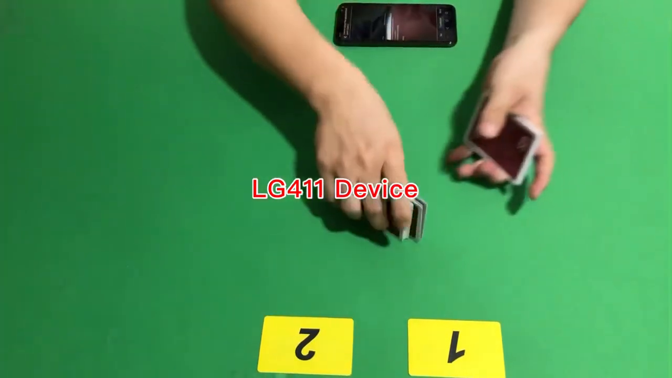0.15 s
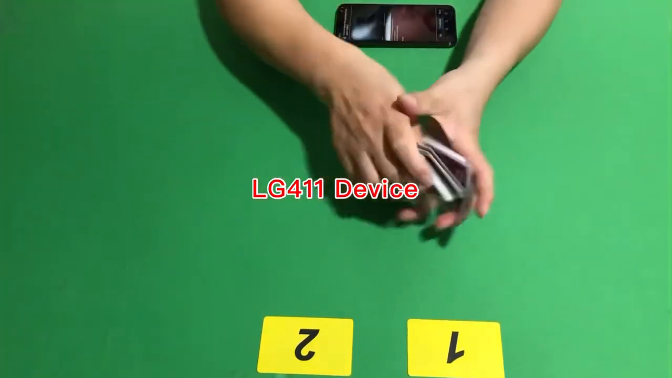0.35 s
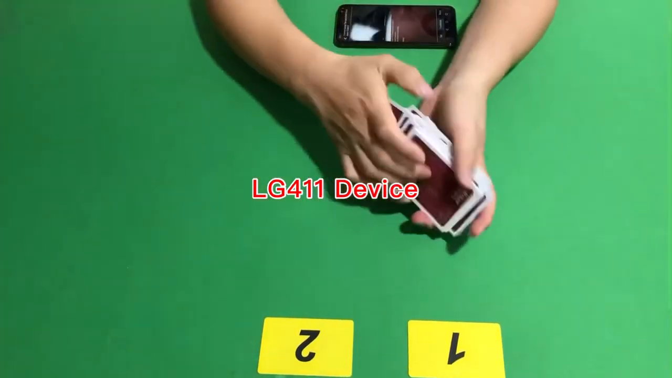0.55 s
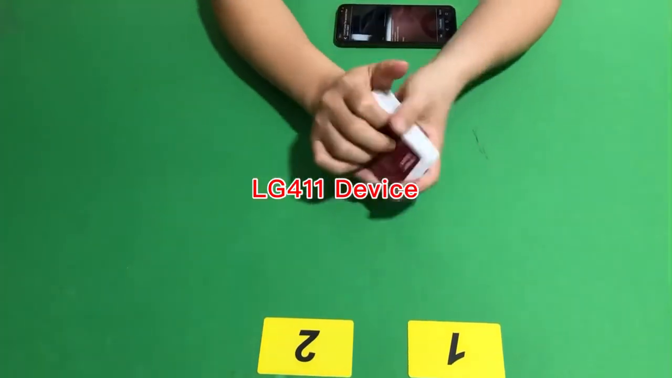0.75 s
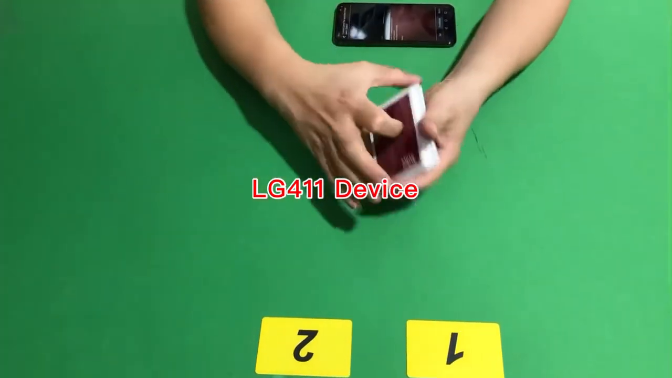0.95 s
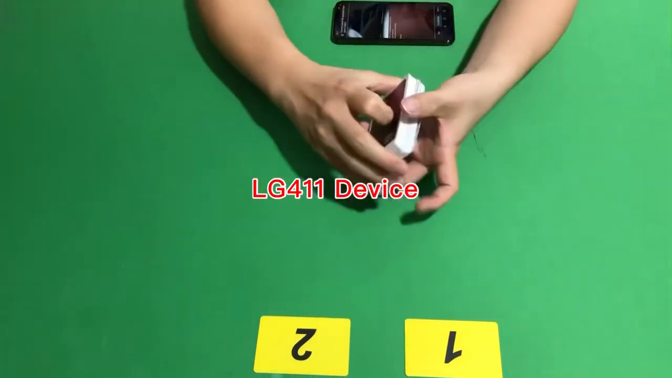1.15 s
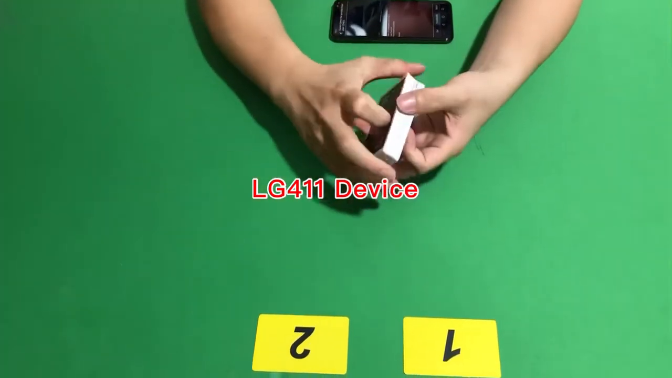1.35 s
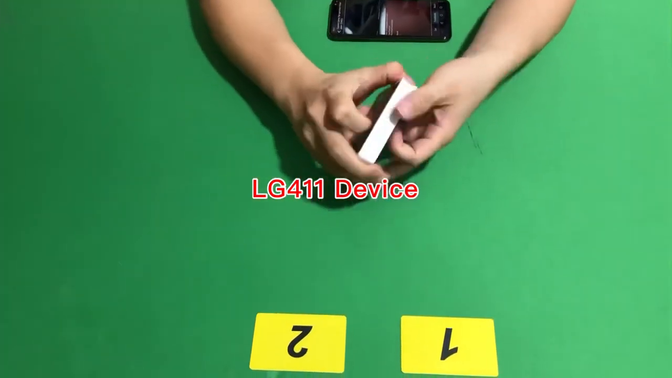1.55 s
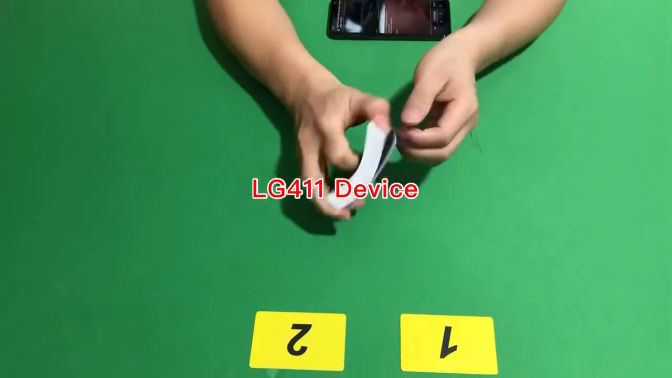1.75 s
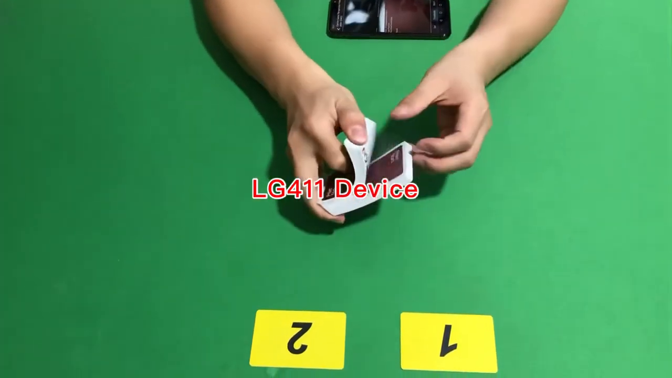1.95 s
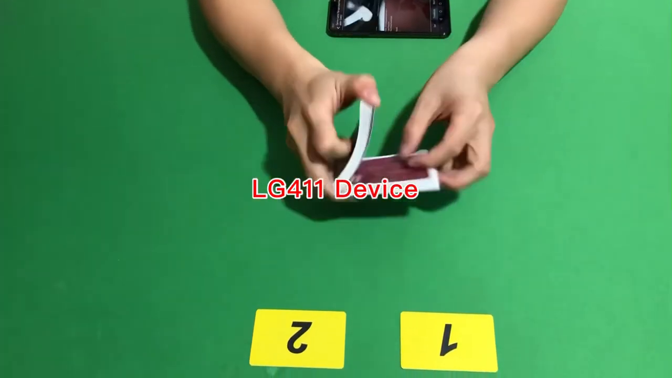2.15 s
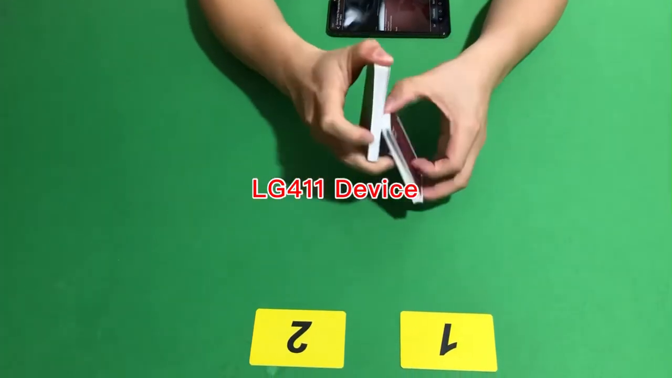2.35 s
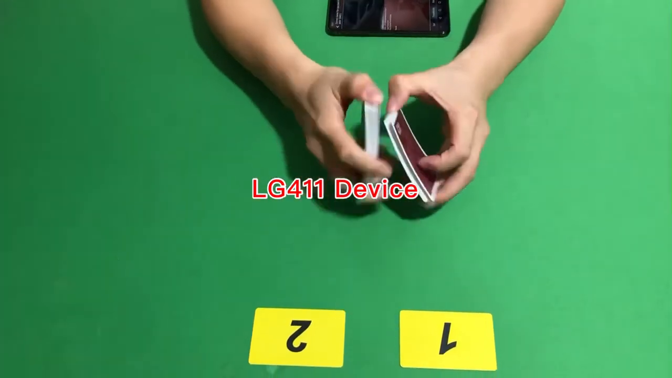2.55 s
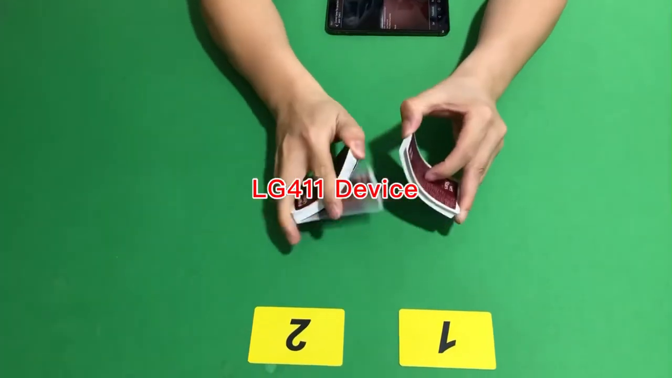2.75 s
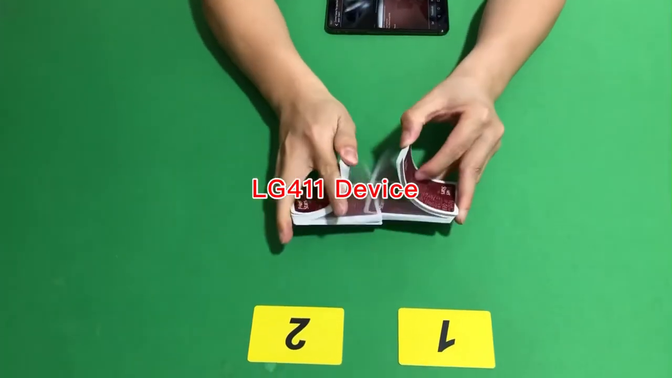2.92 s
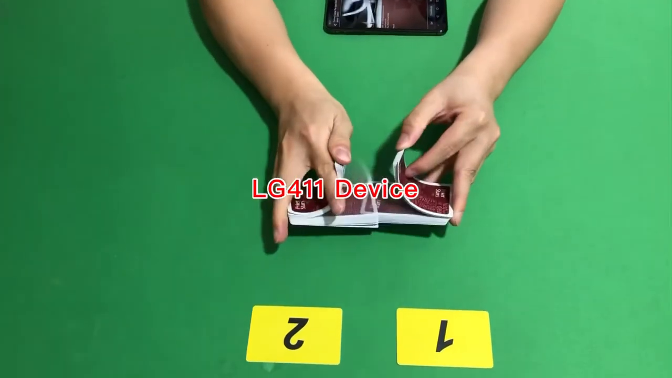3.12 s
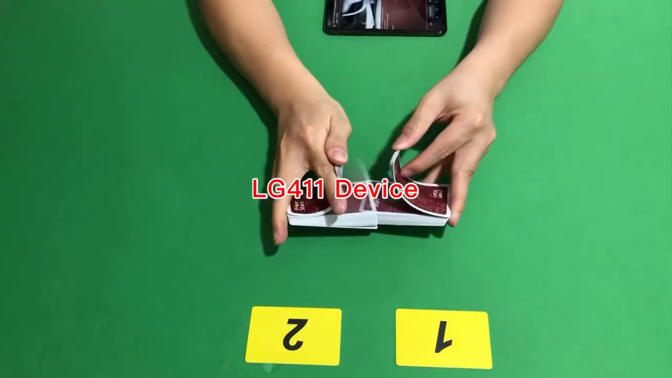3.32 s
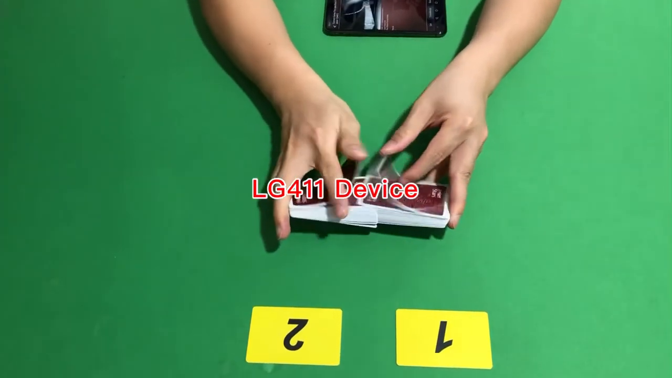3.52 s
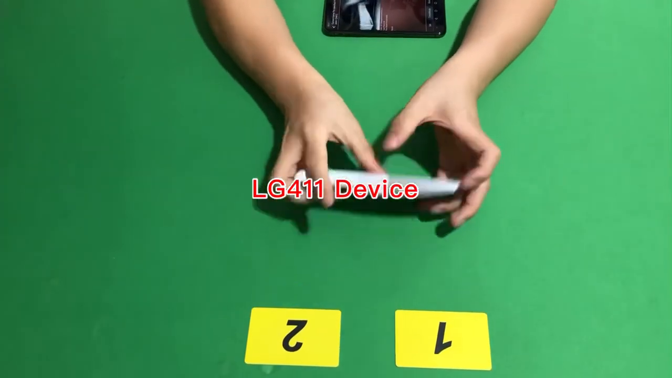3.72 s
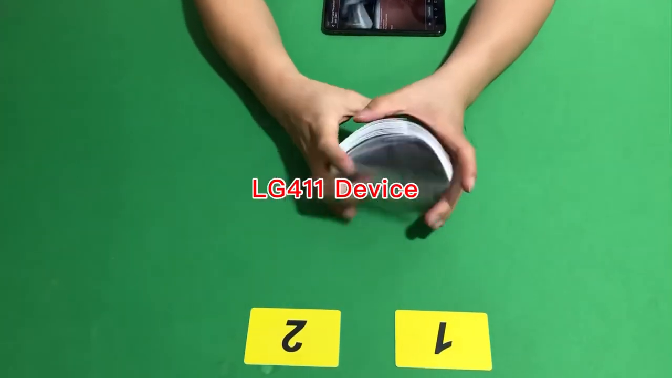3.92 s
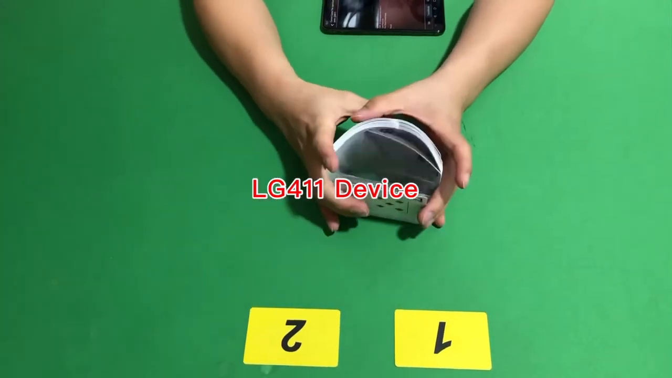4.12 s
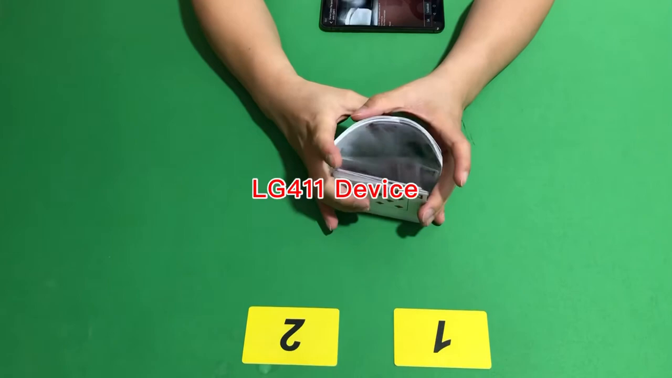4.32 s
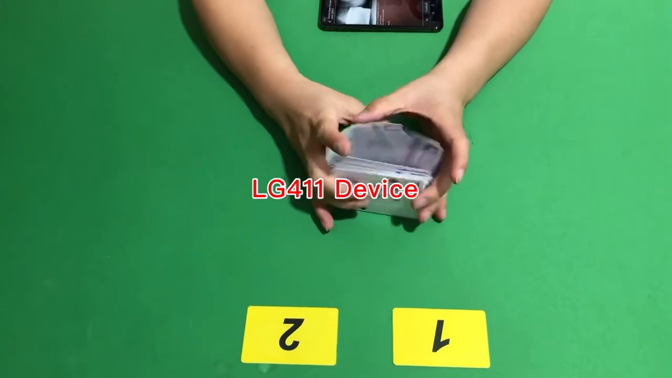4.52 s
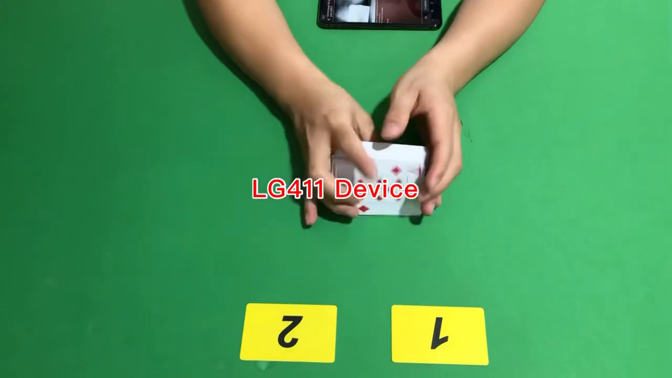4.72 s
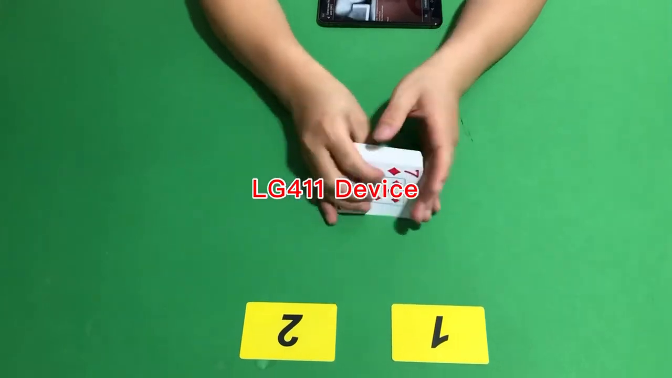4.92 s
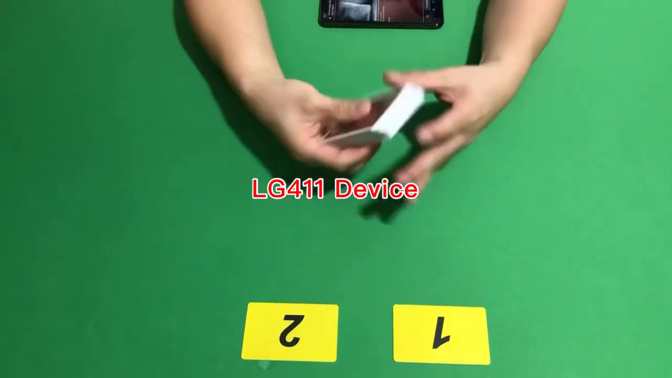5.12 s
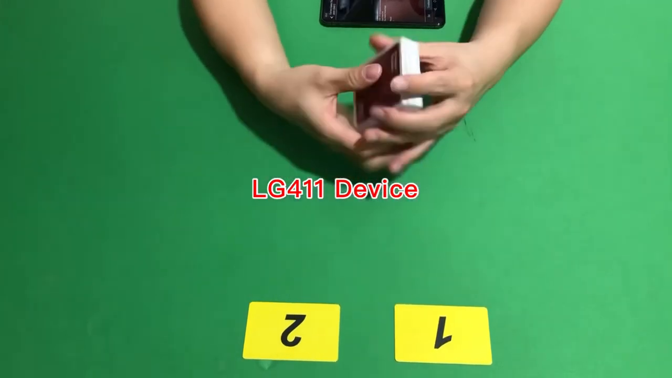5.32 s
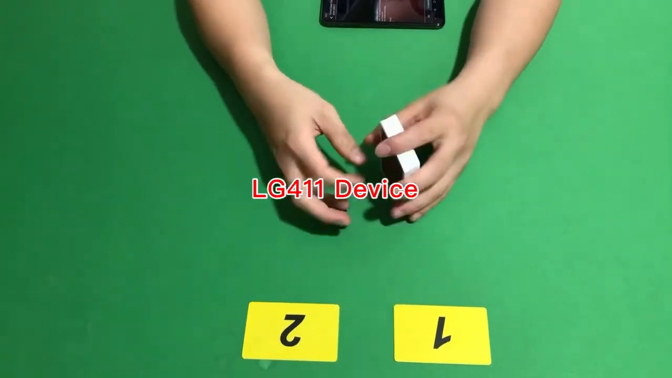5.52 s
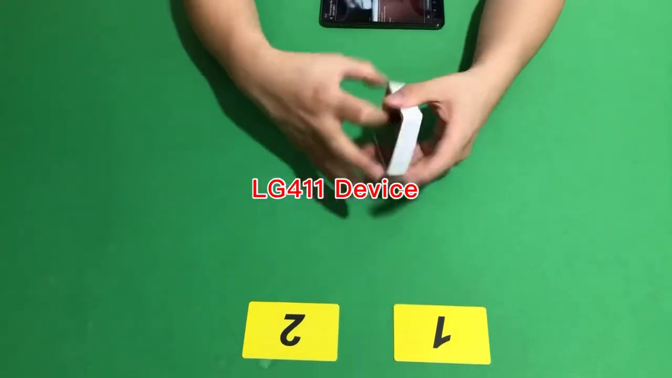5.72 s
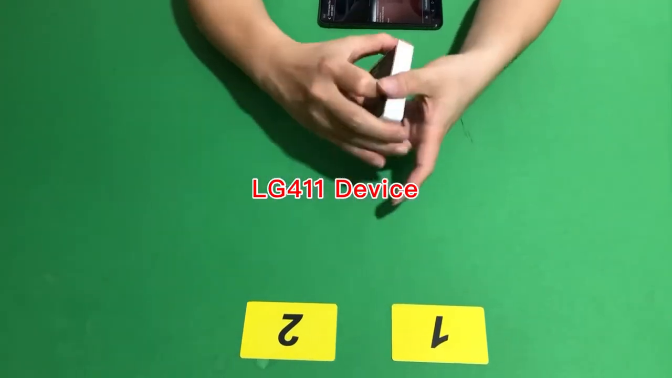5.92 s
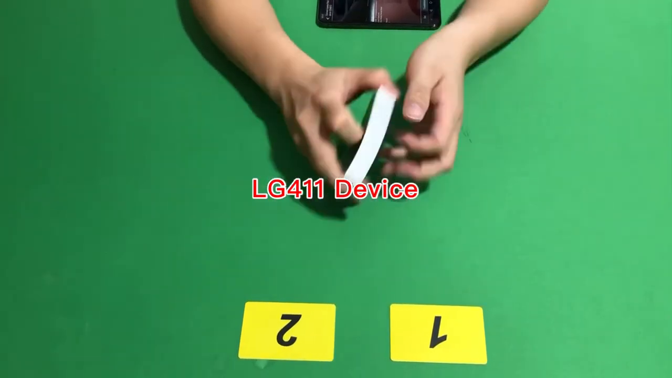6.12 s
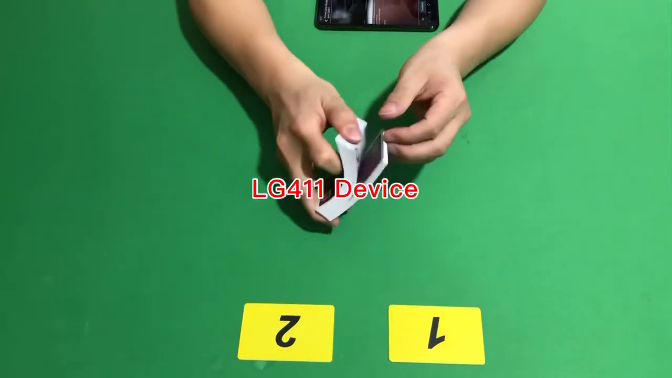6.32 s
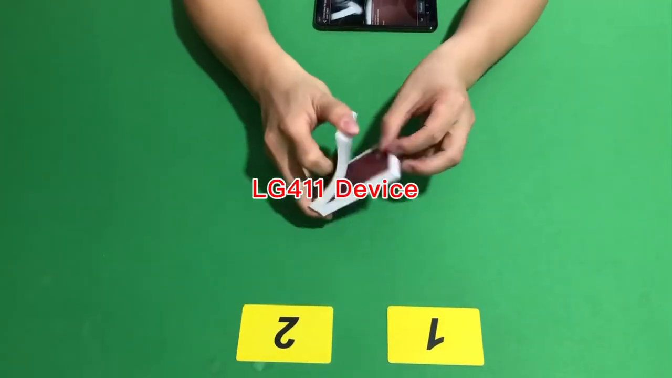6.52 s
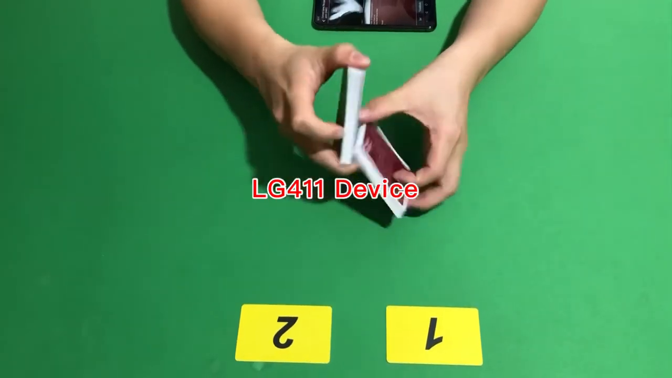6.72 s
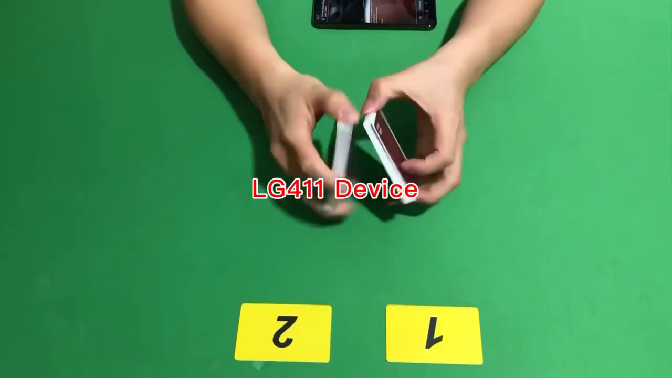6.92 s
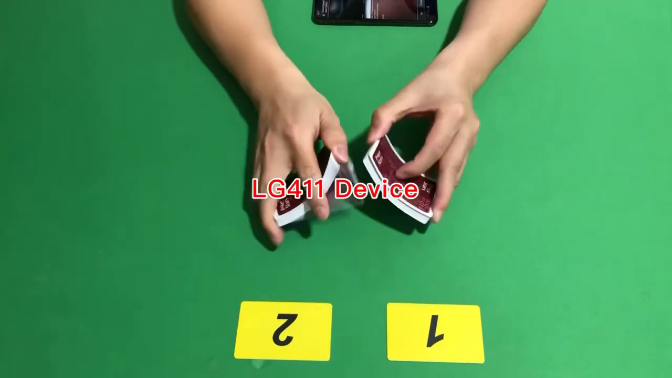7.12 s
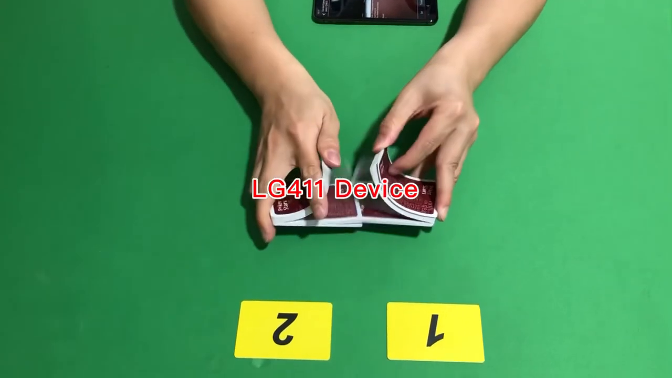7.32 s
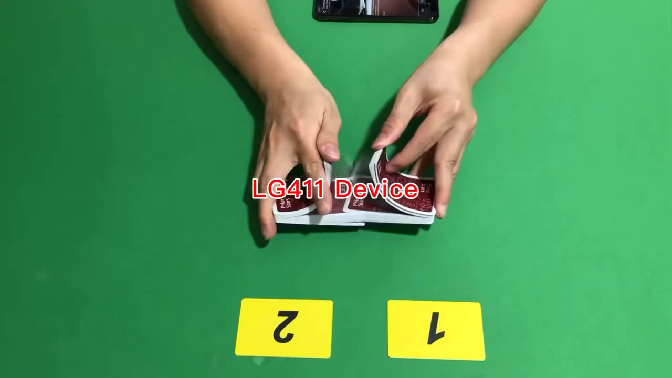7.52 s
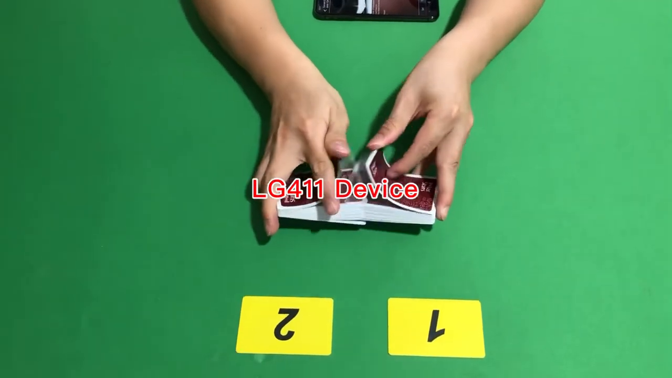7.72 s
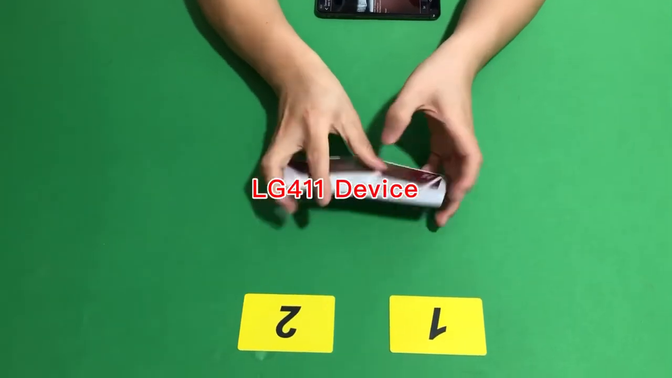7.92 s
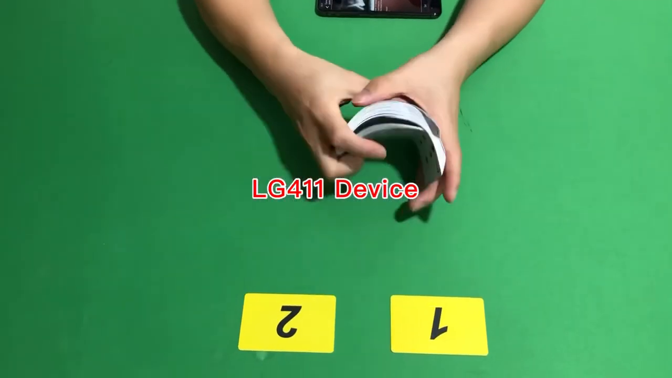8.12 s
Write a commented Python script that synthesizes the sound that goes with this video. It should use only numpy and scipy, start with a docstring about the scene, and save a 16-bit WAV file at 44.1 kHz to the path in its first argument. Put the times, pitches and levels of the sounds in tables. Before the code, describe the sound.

Two card shuffles in a row: taps, a quick purring split, rapid crackling riffle, then a bright papery rush, over faint low ventilation hum.

```python
"""A deck of playing cards is shuffled twice over a cloth-covered table in a small room.
A packet knocks on the table in ringing modes, and the thumb flicks off half the deck in chirping flicks.
The halves riffle together in single snaps, then the arched deck cascades flat in grainy, hissing noise.
Cards and fingers slide, tap and chafe throughout, as shaped noise; a low ventilation hum lies beneath."""
import sys
import numpy as np
from scipy import signal
from scipy.fft import rfft, irfft, next_fast_len
from scipy.io import wavfile
from scipy.ndimage import uniform_filter1d, map_coordinates

SR = 44100
rng = np.random.default_rng(int(sys.argv[2]) if len(sys.argv) > 2 else 0)


def generate_wav(sig):
    """Save sig (samples, or channels by samples) to the path in sys.argv[1] as 16-bit PCM at SR."""
    pcm = np.round(np.clip(np.atleast_2d(sig).T, -1, 1) * 32767).astype(np.int16)
    wavfile.write(sys.argv[1], SR, pcm)


N = 364266
TIME = np.arange(N) / SR
TOP_HZ = 15900  # upper limit of the whole sound
SIZE = 1024  # samples in one snap
SNAP_S = .005  # snap levels are rms as if all the energy fell within this time
SNAP_T, SNAP_HZ = np.arange(SIZE) / SR, np.fft.rfftfreq(SIZE, 1 / SR)

# spectrum of the ventilation hum: hz, level_db
HUM_COLOUR = [(25, -47.5), (45, -6), (87, -2.5), (132, 1.5), (290, -9), (480, -16), (1000, -17.5),
              (4000, -36.5), (15500, -87)]
# spectrum of card faces and fingers rubbing: hz, level_db
RUB_COLOUR = [(150, -17), (900, 1), (5500, 0.5), (9000, -2.5), (15500, -6.5)]
# cards sliding over each other, in the hands and as the bridge starts and ends:
# peak_s, level_db, rise_s and fall_s (time to 20 dB below the peak), tilt_db_per_octave
SLIDES = [(.068, -42.5, 0.063, 0.033, -1.5), (0.309, -41.5, 0.028, 0.036, -2.5),
          (0.358, -38.5, 0.0091, 0.016, -4), (.18, -49, 0.073, 0.09, -2), (.42, -52.5, 0.11, 0.057, 0.5),
          (.555, -50, 0.028, 0.02, -0.5), (0.638, -32.5, 0.052, 0.018, 4), (0.713, -47.5, 0.024, 0.011, 0),
          (.845, -57.5, .025, 0.041, -2), (2.11, -52, 0.04, 0.028, -2), (2.768, -36.5, 0.004, 0.021, -1),
          (3.862, -25, .03, 0.083, 11.5), (4.46, -20.5, .035, 0.012, 12.5), (4.89, -46.5, 0.079, 0.1, -2.5),
          (4.957, -39.5, 0.018, 0.014, -2), (5.36, -54, 0.054, 0.065, -1.5),
          (5.441, -41, 0.0014, 0.0092, -3), (6.145, -52, .012, 0.36, -5.5), (6.725, -59.5, 0.034, 0.06, -3),
          (7.183, -35, 0.033, 0.018, -1), (7.98, -46.5, 0.0053, 0.013, -3)]
# packets and card edges tapping each other: start_s, level_db, centre_hz
TAPS = [(0.0156, -42.5, 1380), (0.0543, -30, 1890), (.087, -42, 3260), (0.2136, -36.5, 3700),
        (0.3242, -29, 3240), (0.3594, -34.5, 3020), (1.677, -43.5, 4540), (2.343, -49, 5570),
        (2.747, -38, 5000), (3.9228, -26.5, 2960), (3.9428, -29, 3470), (4.2709, -23.5, 4230),
        (4.627, -40, 1360), (4.638, -37, 1430), (4.664, -45.5, 1900), (4.96, -51, 3000), (5.583, -54, 4500),
        (6.1225, -33, 4000), (6.753, -53.5, 4200), (7.099, -51, 3740), (7.130, -41, 4720),
        (7.8362, -37, 2440), (8.187, -35, 2900), (8.215, -49, 1710), (8.236, -35.5, 550)]
# the deck knocking on the table:
# start_s, thud_gain_db, contact_cutoff_hz (lower is softer), packet_clack_gain_db
KNOCKS = [(0.0542, -30.5, 1200, -16), (.088, -33, 1070, -36), (5.445, -27, 173, -36.5)]
# modes of the table top, before the contact weighs them: pitch_hz, level_db, t60_s
TABLE_MODES = [(86.5, -5.5, 1.2), (96, 10.5, 0.12), (135, -4, 0.85), (172, 7, 0.2), (269, -7, 0.42),
               (403, 7, 0.1), (570, -3, 0.13)]
# modes of the stiff packet itself: pitch_hz, level_db, t60_s
PACKET_MODES = [(1430, 4.5, 0.01), (2470, 6.5, 0.014), (2600, 0, 0.013)]

# the thumb running down the deck to split it in half:
# first_card_s, last_card_s, swollen_level_db (of the bending wave), brake (extra last gap, in starting gaps)
SPLITS = [(1.713, 1.919, -35, .8), (6.21, 6.374, -38, 1.4)]
# spectrum of a loosely held card's bending wave: hz, level_db
LOOSE_CARD = [(100, -32), (290, 8.5), (450, 10), (700, 4.5), (900, 7), (1250, 2), (2000, 0.5), (2900, 3.5),
              (4200, -8.5), (15000, -18)]
# spectrum of a card edge clicking: hz, level_db
EDGE_COLOUR = [(800, -10), (2500, 2), (5500, 2), (9000, -1), (15500, -5.5)]
EDGE_TILT, EDGE_TILT_HZ = 0.26, 2800  # stronger clicks reach higher: dB per octave per dB, above this pitch
CARD_GAP_S, SPEED_UP, BRAKE_CARDS = .0109, .37, .85  # mean gap; share it shrinks by; cards the thumb brakes over
GAP_JITTER = .05  # no two cards leave the thumb quite alike
SPLIT_SWELL_DB, SPLIT_SWELL_SHARE = 10, 0.61  # the purr swells by this much over this share of the run
RUSTLE_DB = -17  # the passing cards brush each other, relative to their flicks

# cards or fingertips chafing in a narrow band:
# peak_s, level_db, half_length_s (where the swell is down to 1/e), centre_hz
CHAFES = [(2.211, -51, 0.029, 1950), (2.3, -57.5, 0.033, 1840), (2.922, -45.5, 0.084, 3040),
          (3.898, -32.5, 0.033, 5270), (4.933, -44.5, 0.017, 3570), (6.129, -37, 0.0034, 4340),
          (6.892, -54.5, 0.0033, 4030), (8.1, -38, 0.015, 3460)]

# the two riffles: release_s (thumbs start to let go), last_card_s, scrape_db (midway, before it catches),
# first_edge_db and last_edge_db (edge click over bending wave, for a snap of usual level)
RIFFLES = [(2.726, 3.522, -46, -5.5, 8), (7.17, 7.705, -44.5, -1.5, 1.5)]
# cards snapping off the thumbs: start_s, level_db
SNAPS = [(2.8194, -30), (2.835, -48), (2.849, -29), (2.854, -32.5), (2.875, -27), (2.905, -29.5),
         (2.9342, -34), (2.9419, -31.5), (2.977, -28), (3.0136, -26.5), (3.038, -32.5), (3.046, -28),
         (3.065, -30), (3.0753, -29.5), (3.0978, -34.5), (3.1063, -29), (3.1401, -28), (3.1475, -36),
         (3.1789, -31.5), (3.1857, -24), (3.2118, -28.5), (3.223, -32.5), (3.239, -24), (3.256, -34),
         (3.27, -27), (3.2942, -29.5), (3.3077, -27.5), (3.3411, -24), (3.3708, -27.5), (3.3763, -39),
         (3.3989, -27), (3.41, -31.5), (3.438, -29), (3.4428, -30.5), (3.4762, -27), (3.5099, -30.5),
         (7.2028, -35), (7.2293, -31), (7.2557, -26.5), (7.2804, -29.5), (7.3086, -28), (7.3359, -31.5),
         (7.3614, -26.5), (7.3661, -33), (7.3964, -25.5), (7.426, -28), (7.453, -31.5), (7.4576, -33),
         (7.4823, -26.5), (7.496, -33), (7.5035, -30.5), (7.5259, -31.5), (7.5308, -27.5), (7.5487, -33.5),
         (7.5619, -30.5), (7.5746, -30.5), (7.5853, -32.5), (7.5947, -32), (7.6015, -36), (7.6152, -25),
         (7.632, -28.5), (7.6494, -27), (7.6679, -27), (7.6821, -35), (7.6956, -41), (7.711, -35.5),
         (7.7141, -23.5)]
# spectrum of a tightly bent card's bending wave: hz, level_db
BENT_CARD = [(100, -25), (300, -1), (430, 0.5), (680, -2), (1020, 5.5), (1350, -2), (1900, 4.5),
             (2500, -14.5), (3400, -0.5), (5500, -12.5), (15000, -44.5)]
# spectrum of card edges scraping down the thumbs: hz, level_db
SCRAPE_COLOUR = [(150, -8), (900, 4), (3300, 2.5), (4600, -1), (9000, -5.5), (15500, -8.5)]
SCRAPE_RISE_S, SCRAPE_FALL_S = 0.029, 0.0089
SCRAPE_SWELL_DB = 2.5  # the thumbs bear down harder as the packets thin
CATCH_RATE, CATCH_DB = 110, 3.5  # the scrape catches and slips: random knots a second, depth
USUAL_DB, EDGE_GROWS = -29.5, 0.22  # a harder snap is brighter: dB of edge click per dB above the usual level
EDGE_SPREAD_DB = 3  # card-to-card spread of the edge click
SLAP_S, SLAP_DB = 0.0017, -8  # mean delay and level of the softer slap onto the pile
SLAP_EDGE_DB = 3.5  # the slap has this much more edge click over its bending wave
DRAG_S, DRAG_DB = 0.00027, -4.5  # the edge drags harder and harder just before it lets go

# the bridge, arched cards cascading flat: first_card_s, length_s, hiss_db
BRIDGES = [(3.776, 0.7, -29), (8.017, .668, -29.5)]
# spectrum of cards slipping off each other: hz, level_db
HISS_COLOUR = [(500, -63), (1700, -8), (2700, 6), (4700, 4.5), (5400, 7), (6400, 7), (11000, 5),
               (15500, 6.5)]
# spectrum of cards landing on the pile: hz, level_db
FLUTTER_COLOUR = [(70, -16), (170, 5), (400, 5.5), (560, 0.5), (900, 2.5), (2200, -1), (4000, -30)]
HISS_RISE_S, HISS_FALL_DB_PER_S = 0.05, 379
FLUTTER_DB, FLUTTER_DELAY_S, FLUTTER_FALL_DB_PER_S = -16, 0.077, 38  # landings, level relative to the hiss
# bunches of cards dropping from the bridge onto the fingers: start_s, level_db
THUMPS = [(3.972, -38), (4.17, -47), (4.511, -42), (4.567, -43)]
THUMP_HZ, THUMP_T60_S = 156, 0.21

# decay of the room: hz, t60_s
ROOM_DECAY = [(150, 0.92), (2500, 0.83), (8000, 0.76), (15000, 0.51)]
# colour of the room's answer: hz, level_db
WALL_COLOUR = [(400, 2.5), (950, 0), (3200, 0.5), (5500, -2), (15000, -10)]


def amp(db):
    """Decibels to gain."""
    return 10 ** (np.asarray(db) / 20)


def unit(x):
    """Scale to rms 1."""
    return x / np.sqrt(np.mean(x ** 2) + 1e-20)


def along(points, hz):
    """Read (hz, value) points on a log frequency axis."""
    f, v = np.transpose(points)
    return np.interp(np.log(hz + 1), np.log(f), v)


def filtered(x, response):
    """Shape x with a gain that depends on frequency."""
    size = next_fast_len(len(x) + SR // 10)
    return irfft(rfft(x, size) * response(np.fft.rfftfreq(size, 1 / SR)), size)[:len(x)]


def coloured(x, spectrum, tilt_db=0):
    """Shape x with a spectrum, tilted per octave, at rms 1."""
    return unit(filtered(x, lambda hz: amp(along(spectrum, hz) + tilt_db * np.log2(hz + 1))))


def add(track, s, sound):
    """Mix a sound into the track at time s."""
    start = max(round(s * SR), 0)
    track[start:start + len(sound)] += sound[:max(N - start, 0)]


def onset(t, rise_s):
    """A smooth rise from 0 to 1 that starts at t = 0."""
    return 1 - np.exp(-(np.maximum(t, 0) / rise_s) ** 2)


def wobble(rate):
    """A smooth random curve, rate knots a second, clipped to -2 and 1."""
    knots = TIME * rate
    return map_coordinates(rng.standard_normal(2048), [knots], mode="mirror").clip(-2, 1)


def ripple(step_hz):
    """A smooth random curve over frequency: no two cards are bent alike."""
    knots = SNAP_HZ / step_hz
    return map_coordinates(rng.standard_normal(64), [knots], mode="mirror")


def band(hz, centre, width):
    """Gain of one resonance, its width in octaves."""
    return 1 / np.sqrt(1 + (np.log2((hz + 1) / centre) / width) ** 2)


def ringing(modes, t, contact):
    """Damped modes, each as strong as the contact drives it."""
    out = 0
    for hz, level_db, t60 in modes:
        out = out + contact(hz) * amp(level_db - 60 * t / t60) * np.sin(2 * np.pi * hz * t)
    return out


def friction(rate, grain, spread_db):
    """Smooth rubbing noise with tiny stick-slip impulses, rate a second on average."""
    struck = rng.random(N) < rate / SR
    strength = amp(spread_db * np.clip(rng.standard_normal(N), -2, 2))
    slips = struck * rng.choice([-1, 1], N) * strength
    return unit(rng.standard_normal(N) + grain * unit(slips))


def burst(t60, rise):
    """Spectrum of a puff of noise that builds up and dies, mean power 1."""
    puff = rng.standard_normal(SIZE) * amp(-60 * SNAP_T / t60) * onset(SNAP_T, rise)
    return rfft(puff / np.linalg.norm(puff))


def snap(excitation, colour_db):
    """A short excitation through a causal colour, at level 1."""
    # folding the cepstrum gives the minimum-phase version of the colour
    cepstrum = irfft(np.log(amp(colour_db) + 1e-6))
    cepstrum[1:SIZE // 2] *= 2
    cepstrum[SIZE // 2 + 1:] = 0
    sound = irfft(excitation * np.exp(rfft(cepstrum)))
    return sound * np.sqrt(SNAP_S * SR) / np.linalg.norm(sound)


def flick(card, edge_db, travel_s, scatter, rattle_t60):
    """One released card: its edge clicks and a bending wave runs along it."""
    # bending waves travel at a speed that goes with the root of frequency, so the snap chirps downward
    delay = travel_s * amp(rng.normal(0, 2)) * np.sqrt(1000 / (SNAP_HZ + 100))
    chirp = np.exp(-2j * np.pi * np.cumsum(delay - delay[-1] / 2) * SR / SIZE)
    rattle = scatter * burst(rattle_t60, rise=0.0013)
    wave = snap(chirp + rattle, along(card, SNAP_HZ) + 2 * ripple(980))
    bright_db = EDGE_TILT * edge_db * np.log2(np.maximum(SNAP_HZ / EDGE_TILT_HZ, 1))
    edge_puff = burst(0.0026, rise=0.00049) + 0.24 * burst(0.0073, rise=0.0014)
    click = snap(edge_puff, along(EDGE_COLOUR, SNAP_HZ) + bright_db + 2 * ripple(1700))
    return wave + amp(edge_db) * click


def ventilation_hum():
    """Steady noise with its weight in the lows."""
    return amp(-50) * coloured(rng.standard_normal(N), HUM_COLOUR)


def handling():
    """Held cards never lie quite still: a faint, uneven rustle with tiny ticks."""
    return amp(-72 + 2.7 * wobble(14)) * coloured(friction(160, 0.79, 6.5), RUB_COLOUR)


def slides():
    """Cards rub over each other in grainy strokes that swell and fade, each with its own brightness."""
    out, rub, size = np.zeros(N), friction(1200, 0.2, 6), SR // 2
    for s, db, rise, fall, tilt_db in SLIDES:
        start = max(round(s * SR) - size // 2, 0)
        t = TIME[start:start + size] - s
        distance = np.maximum(-t / rise, t / fall).clip(0)
        swell = amp(db - 20 * distance ** 2.2)
        out[start:start + size] += swell * coloured(rub[start:start + size], RUB_COLOUR, tilt_db)
    return out


def taps():
    """Card stock clacks: a short noise burst through one broad, quickly damped resonance."""
    out = np.zeros(N)
    for s, db, hz in TAPS:
        resonance_db = 20 * np.log10(band(SNAP_HZ, hz, 0.88))
        colour_db = resonance_db - 1.6 * np.log2((SNAP_HZ + 1) / hz) ** 2
        add(out, s, amp(db) * snap(burst(0.016, rise=0.00044), colour_db))
    return out


def knocks():
    """The packet clacks, thuds on the cloth and rings the table; a soft contact leaves only the low modes."""
    out, t = np.zeros(N), TIME[:SR]
    for s, db, soft_hz, clack_db in KNOCKS:
        contact = lambda hz: (hz / soft_hz) ** 0.33 / np.sqrt(1 + (hz / soft_hz) ** 3.8)
        # the crowded higher modes blur into a short rattle
        blur = unit(filtered(rng.standard_normal(SR), lambda hz: contact(hz) * hz / (hz + 300)))
        rattle = blur * amp(-4.5 - 60 * t / 0.14)
        thud = amp(db) * (ringing(TABLE_MODES, t, contact) + rattle) * (1 - np.exp(-t / 0.0042))
        clack = amp(clack_db) * ringing(PACKET_MODES, t, np.ones_like) * onset(t, 0.0014)
        add(out, s, thud + clack)
    # the table is too small to radiate deep bass
    return signal.sosfilt(signal.butter(4, 45, "high", fs=SR, output="sos"), out)


def splits():
    """Loose cards flip to the other hand in a rustling purr that quickens and swells until the thumb brakes."""
    out, brush = np.zeros(N), np.zeros(N)
    for start, end, db, brake in SPLITS:
        cards = np.arange(round((end - start) / CARD_GAP_S))
        gaps = 1 - SPEED_UP * cards / len(cards) + brake * np.exp(-cards[::-1] / BRAKE_CARDS)
        gaps = gaps * (1 + GAP_JITTER * rng.standard_normal(len(gaps)))
        for progress in np.append(0, np.cumsum(gaps)) / gaps.sum():
            s = start + progress * (end - start)
            gain = amp(db + SPLIT_SWELL_DB * min(progress / SPLIT_SWELL_SHARE - 1, 0))
            add(out, s, gain * flick(LOOSE_CARD, edge_db=-7, travel_s=.002, scatter=.5, rattle_t60=.024))
            add(brush, s - SNAP_T.mean(), gain * np.hanning(SIZE))
    return out + amp(RUSTLE_DB) * brush * coloured(friction(1000, .5, 5), RUB_COLOUR)


def chafes():
    """Cards or fingertips chafe: noise in a narrow band swells and fades."""
    out, t = np.zeros(N), TIME[:SR // 2]
    for s, db, half, centre in CHAFES:
        noise = unit(filtered(rng.standard_normal(len(t)), lambda hz: band(hz, centre, 0.2) ** 2))
        add(out, s - t.mean(), amp(db) * noise * np.exp(-((t - t.mean()) / half) ** 2))
    return out


def bent_flick(edge_db):
    """A tightly bent card springs free, with a shorter chirp than a loose one."""
    return flick(BENT_CARD, edge_db, travel_s=0.001206, scatter=0.62, rattle_t60=0.014)


def riffles():
    """Bent cards snap down from both thumbs, their edge clicks growing, over a scrape that catches and slips."""
    out, pull = np.zeros(N), np.zeros(N)
    for start, end, scrape_db, *_ in RIFFLES:
        progress = np.clip((TIME - start) / (end - start), 0, 1)
        gate = onset(TIME - start, SCRAPE_RISE_S) * np.exp(-np.maximum(TIME - end, 0) / SCRAPE_FALL_S)
        pull += gate * amp(scrape_db + SCRAPE_SWELL_DB * (progress - .5) + CATCH_DB * wobble(CATCH_RATE))
    for s, db in SNAPS:
        start, end, _, first_db, last_db = min(RIFFLES, key=lambda row: abs(row[0] - s))
        edge_db = np.interp(s, (start, end), (first_db, last_db))
        edge_db += EDGE_GROWS * (db - USUAL_DB) + EDGE_SPREAD_DB * rng.standard_normal()
        gain = amp(db) / np.hypot(1, amp(edge_db))  # wave and click together reach the snap level
        add(pull, s - SIZE / SR, gain * amp(DRAG_DB) * np.exp(-SNAP_T[::-1] / DRAG_S))
        add(out, s, gain * bent_flick(edge_db))
        slap_s = s + SLAP_S * (rng.random() + .5)
        add(out, slap_s, gain * amp(SLAP_DB) * bent_flick(edge_db + SLAP_EDGE_DB))
    return out + pull * coloured(friction(770, 0.36, 14.0), SCRAPE_COLOUR)


def bridge():
    """The arched cards slip off each other in a grainy hiss and flutter onto the pile."""
    # each passing card brings out its own bands for a few milliseconds
    z = signal.stft(friction(3000, .6, 3.5), nperseg=128)[2]
    patches = uniform_filter1d(rng.standard_normal(z.shape), size=4, axis=0)
    patches = unit(uniform_filter1d(patches, size=5, axis=1))
    bunches = unit(uniform_filter1d(rng.standard_normal(z.shape[1]), size=6))
    grainy = signal.istft(z * amp(2.7 * patches + 1.9 * bunches), nperseg=128)[1][:N]
    hiss = coloured(grainy, HISS_COLOUR)
    # each landing is a short papery pat on a soft rustle, 120 a second on average
    landings = (rng.random(N) < 120 / SR) * amp(3 * rng.standard_normal(N).clip(-2, 1))
    pats = signal.fftconvolve(landings, np.exp(-SNAP_T / 0.0033))[:N]
    flutter = coloured((pats + 0.35) * rng.standard_normal(N), FLUTTER_COLOUR)
    out = np.zeros(N)
    for start, length, db in BRIDGES:
        t = TIME - start
        after = np.maximum(t - length, 0)
        hiss_gain = amp(db - HISS_FALL_DB_PER_S * after)
        flutter_gain = amp(db + FLUTTER_DB - FLUTTER_FALL_DB_PER_S * after)
        out += onset(t, HISS_RISE_S) * hiss_gain * hiss
        out += onset(t - FLUTTER_DELAY_S, HISS_RISE_S) * flutter_gain * flutter
    return out


def thumps():
    """The fingers under the bridge catch falling cards with a soft, low thump of decaying noise."""
    out, t = np.zeros(N), TIME[:SR // 2]
    for s, db in THUMPS:
        noise = unit(filtered(rng.standard_normal(len(t)), lambda hz: band(hz, THUMP_HZ, 0.29) ** 3))
        add(out, s, noise * onset(t, 0.0095) * amp(db - 60 * t / THUMP_T60_S))
    return out


def room(x):
    """Bare walls answer with a diffuse noise tail, redrawn every quarter second as the hands move."""
    out, hop = np.zeros(N), SR // 4
    for start in range(0, N, hop):
        hz, t, z = signal.stft(rng.standard_normal(SR * 3 // 4), SR, nperseg=256)
        decay = amp(-60 * t / along(ROOM_DECAY, hz)[:, None])
        tail = signal.istft(z * decay, SR, nperseg=256)[1]
        tail = filtered(tail, lambda f: amp(along(WALL_COLOUR, f)))
        answer = signal.fftconvolve(x[start:start + hop], tail / np.linalg.norm(tail))
        add(out, start / SR + .005, answer)  # the answer starts 5 ms late
    return out


def scene():
    """Cards and table in the room, over a low ventilation hum."""
    rubs_and_taps = handling() + slides() + taps() + chafes()
    shuffle = knocks() + splits() + riffles() + bridge() + thumps()
    cards = rubs_and_taps + shuffle
    return (cards + amp(-13.0) * room(cards) + ventilation_hum())[None]


def record(dry):
    """Cut everything from TOP_HZ up."""
    return np.array([filtered(channel, lambda hz: hz < TOP_HZ) for channel in dry])


dry = scene()
out = record(dry)
generate_wav(out)
```